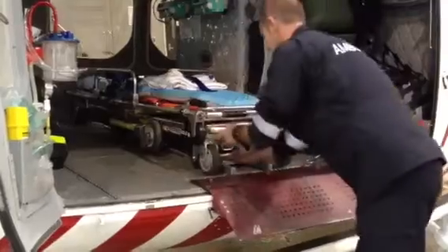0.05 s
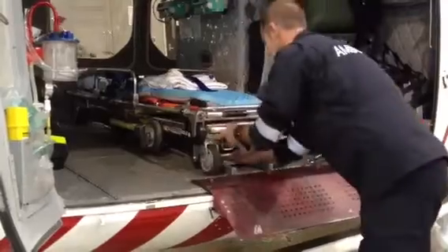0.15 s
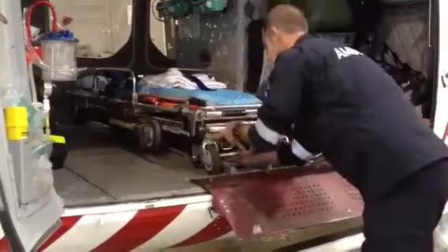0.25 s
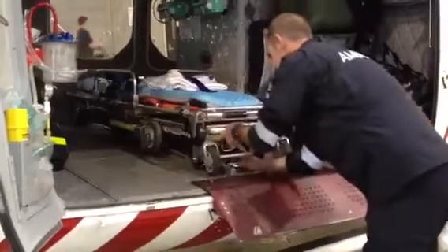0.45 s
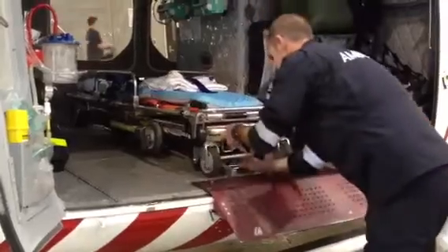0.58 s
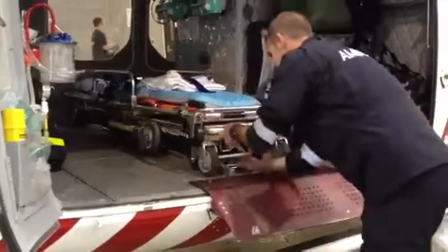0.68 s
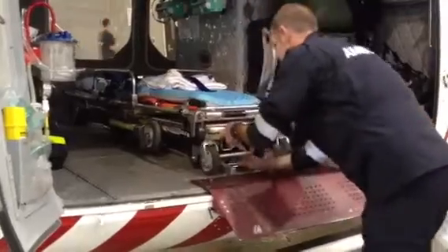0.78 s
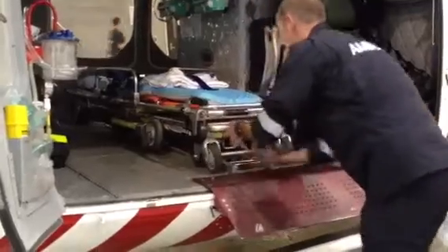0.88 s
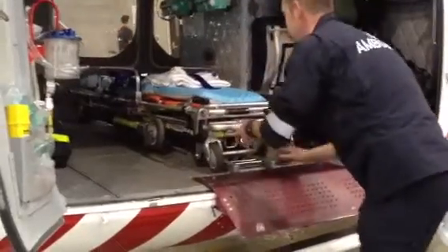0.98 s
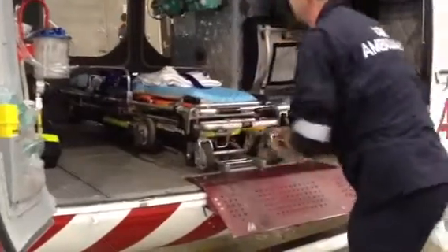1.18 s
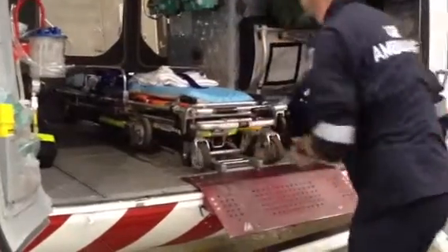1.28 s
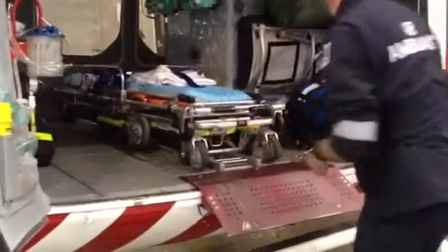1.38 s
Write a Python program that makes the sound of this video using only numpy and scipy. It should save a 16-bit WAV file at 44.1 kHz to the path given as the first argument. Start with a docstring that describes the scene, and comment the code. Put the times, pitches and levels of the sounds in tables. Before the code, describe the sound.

A metal stretcher clacks twice into its floor latch, ringing through a vehicle and hall.

```python
"""A steel catch ticks over soft wheel bumps as a stretcher is pushed into its floor latch, in the open
back of a vehicle parked in a large hall. The metal frame clacks home in two rattling bursts, each blow
a dense crack plus clear ringing modes, and the cabin and the hall ring on. Then the wheels bump the
hollow load floor again and the catch clinks once more, over a low rumble and the hall's steady wash."""
import sys
import numpy as np
from scipy import signal
from scipy.fft import rfft, irfft, next_fast_len
from scipy.io import wavfile

SR = 44100
rng = np.random.default_rng(int(sys.argv[2]) if len(sys.argv) > 2 else 0)


def put_to_file(sound):
    """Save the sound as 16-bit audio at rate SR, in the file named by the first command-line argument."""
    columns = np.atleast_2d(sound).T  # one column per channel
    safe = np.clip(columns, -1, 1)
    whole_steps = np.round(safe * 32767)
    wavfile.write(sys.argv[1], SR, whole_steps.astype(np.int16))


N = 63945
T = np.arange(N) / SR


def frame():
    """The frame rattles into the latch in two runs of hard blows; rows are cracks and rings."""
    # blows on the latch: t/s, level/dB, extra bass/dB, extra treble/dB, clear ring/dB
    blows = [(0.23, -45, 8, 7, -16), (0.2347, -30, -7.5, 0, -12.5), (0.2441, -25, -8, 0.5, 0.5),
             (0.249, -22, 0.5, -2.5, 1), (0.2552, -14, -6, -1, -3), (0.263, -38, 18, -8, -6),
             (0.318, -40.5, 9.5, -13, 4.5), (0.3724, -25, 1, 7, 2.5), (0.381, -20.5, 1, -2, -13),
             (0.386, -22, 7, 6, -6), (0.391, -23.5, 6.5, -10, -4.5), (0.399, -19, -5, -1.5, -1),
             (0.405, -19.5, -5, 5, -0.5), (0.4128, -11.5, -14, -27.5, 2), (0.418, -28, 7.5, 10, 2),
             (0.432, -22.5, -2, 3, -25), (0.441, -24, -5, -3.5, -4)]
    # colour of the frame's crack: f/Hz, level/dB
    colour = [(40, -44), (85, -26), (150, -3), (250, -4.5), (430, -2), (740, -6), (1100, 2), (1550, -6),
              (1950, -5), (3100, -9.5), (4600, -7), (5500, -14.5), (7000, -12.5), (8400, -8), (10000, -16),
              (15000, -18)]
    # its quick damping: f/Hz, t60/s
    decay = [(150, 0.12), (1000, 0.069), (4000, 0.068), (12000, 0.11)]
    # the frame's clear modes: f/Hz, level/dB, nominal t60/s
    modes = [(374, -15, .2), (414, -14, .15), (526, -14, .11), (656, -17, .13), (932, -9, .11),
             (1070, -6, .09), (1194, -7, .11), (1310, -10, .11), (1833, -12, .11), (1901, -14, .11),
             (2033, -16, .1), (2137, -16, .11), (2549, -17, .14), (2809, -19, .14), (3890, -13, .09),
             (4530, -12, .08), (4662, -14, .1), (4800, -13, .1), (7700, -12, .03), (8300, -6, .03),
             (8700, -8, .03)]
    out = np.zeros((2, N))
    for s, db, bass_db, treble_db, ring_db in blows:
        blow = soften(strike(colour, decay, modes, ring_db), attack_s=0.00055)
        add(out, s, from_db(db) * shelves(blow, bass_db, treble_db))
    return out


def catch(t60_s=0.12):
    """The small steel catch ticks, or scrapes with a softer attack; rows are cracks and rings."""
    # ticks and scrapes: t/s, level/dB, attack/s, extra top/dB
    ticks = [(0.0435, -49, 0.002, -5), (0.055, -35, 0.00044, 1), (0.083, -47.5, 0.001, 11),
             (0.093, -52, .003, 6), (0.147, -44, 0.0071, 2), (0.188, -53, .005, -10),
             (0.918, -44.5, 0.0014, -1.5), (0.933, -42, 0.0023, -12), (0.948, -65.5, 0.0028, 13),
             (1.03, -65, 0.0027, 0), (1.10, -65, .005, 0), (1.172, -63, .012, 0)]
    # colour of the catch's bright crack: f/Hz, level/dB
    colour = [(150, -49), (400, -32), (1500, 1.5), (2500, 1), (4500, 8.5), (6500, 0), (8300, 8),
              (10000, 6.5), (12500, -1.5), (15000, -2)]
    # the catch's clear modes: f/Hz, level/dB, nominal t60/s
    modes = [(2370, -3, .09), (2620, -7, .06), (4000, -11, .14), (4797, -7, .12), (5652, -12, .15),
             (6595, -15, .17), (7850, -2, .04), (8274, -4, .09), (9750, -4, .05), (10840, -7, .11),
             (11680, -6, .13), (12820, -11, .13)]
    out = np.zeros((2, N))
    for s, db, attack_s, top_db in ticks:
        tick = soften(strike(colour, [(1, t60_s)], modes, ring_db=0), attack_s)
        add(out, s, from_db(db) * shelves(tick, 0, top_db, treble_hz=11000))
    return out


def load_floor(t60_s=0.26):
    """The hollow load floor rumbles and thuds softly under the shifting wheels."""
    # swell of the rumble: t/s, level/dB
    swell = [(0, -53), (0.07, -49), (0.13, -55.5), (0.25, -49.5), (0.5, -53), (0.77, -55.5), (0.9, -48),
             (1.05, -49), (1.17, -52.5), (1.45, -58.5)]
    # colour of the rumble: f/Hz, level/dB
    rumble_colour = [(40, -44), (85, -30), (130, 0.5), (175, 0.5), (225, -3), (310, -1.5), (430, -6),
                     (650, -4.5), (1000, -14), (3000, -30.5)]
    # wheel bumps: t/s, level/dB
    bumps = [(0.022, -55), (0.041, -47), (0.187, -56), (0.79, -40.5), (0.811, -40), (0.868, -43),
             (0.915, -42), (0.989, -46)]
    # colour of the floor's dull thud: f/Hz, level/dB
    thud_colour = [(85, -16), (130, -1), (310, 3.5), (450, -4), (650, -3.5), (1000, -17), (3000, -41)]
    # the floor's hollow modes: f/Hz, level/dB, nominal t60/s
    modes = [(130.2, -6, 0.43), (220.5, -9, 0.46), (309.5, -4, 0.29), (436, -5, 0.16)]
    out = from_db(np.interp(T, *np.transpose(swell))) * noise(rumble_colour)
    for s, db in bumps:
        thud = strike(thud_colour, [(1, t60_s)], modes, ring_db=-1).sum(axis=0)
        add(out, s, from_db(db) * soften(thud, attack_s=0.006))
    return out


def strike(colour, decay, modes, ring_db, size=16384, scatter_db=4, ring_length=0.97):
    """One contact, never twice the same: rows are the dense crack and the clear ring."""
    t = np.arange(size) / SR
    snap = 1 + from_db(-14) * np.exp(-t / 0.0005)  # the instant of contact stands out
    crack = dense_ring(colour, decay, size) * snap
    crack *= np.sqrt(SR / 100) / np.linalg.norm(crack)  # the energy of 10 ms at rms 1
    ring = 0
    for hz, db, t60 in modes:
        gain = from_db(db + rng.normal() * scatter_db) * rng.choice([-1, 1])
        ring += gain * np.sin(2 * np.pi * hz * t) * from_db(-60 * t / (t60 * ring_length))
    return np.array([crack, from_db(ring_db) * ring])


def dense_ring(colour, decay, size):
    """Countless modes struck at once: each band has its own gain and dies at its own rate."""
    edges_hz = np.r_[30, 70, 110, np.geomspace(160, 17000, 28)]
    t = np.arange(size) / SR
    hz = np.arange(size // 2 + 1) * SR / size
    white = rfft(rng.standard_normal(size))
    out = 0
    for low, high in zip(edges_hz, edges_hz[1:]):
        centre = np.sqrt(low * high)
        band = irfft(white * (hz >= low) * (hz < high), size)
        band *= from_db(-60 * t / at_hz(decay, centre))
        band *= np.sqrt(2 * (high - low) / SR) / np.linalg.norm(band)  # energy follows bandwidth
        out += band * from_db(at_hz(colour, centre))
    return out


def soften(x, attack_s):
    """A sliding or padded contact fades in."""
    return x * np.minimum(T[:x.shape[-1]] / attack_s, 1)


def shelves(x, bass_db, treble_db, bass_hz=550, treble_hz=4000):
    """Turn a contact's bass and treble up or down by the given amounts."""
    low = signal.sosfilt(signal.butter(1, bass_hz, fs=SR, output="sos"), x)
    high = low_cut(x, treble_hz, order=1)
    return x + (from_db(bass_db) - 1) * low + (from_db(treble_db) - 1) * high


def cabin(x):
    """The cabin's close walls answer at once with a short, boomy ring."""
    # colour of the cabin: f/Hz, level/dB
    colour = [(100, 14), (250, 5), (1000, -4), (4000, -3), (12000, -12)]
    # its decay: f/Hz, t60/s
    decay = [(150, 0.49), (1000, 0.62), (12000, 0.5)]
    return reverb(x, colour, decay, level_db=-10, delay_s=0.005)


def hall(x):
    """The hall's distant walls answer later with a long tail."""
    # colour of the hall: f/Hz, level/dB
    colour = [(100, -2), (220, 6), (450, -5.5), (800, -0.5), (1120, -0.5), (1500, 3.5), (2500, 3.5),
              (4700, -1), (5800, 0.5), (8400, -7.5), (12500, -7), (14000, -26)]
    # its decay, longest in the upper mids: f/Hz, t60/s
    decay = [(150, 1.8), (500, 2.6), (1800, 3.44), (4500, 2.93), (8000, 1.32), (13000, 0.61)]
    return reverb(x, colour, decay, level_db=-12.5, delay_s=0.04)


def reverb(x, colour, decay, level_db, delay_s):
    """Diffuse reflections that start after a pre-delay."""
    response = dense_ring(colour, decay, size=65536)
    out = np.zeros(N)
    add(out, delay_s, from_db(level_db) * signal.fftconvolve(x, response)[:N])
    return out


def hall_wash():
    """A steady, dark bed of room tone."""
    # colour of the wash: f/Hz, level/dB
    colour = [(30, 5), (70, 7), (140, -1.5), (400, -3.5), (800, -7), (2000, -1), (4500, -9.5), (5700, -19),
              (9500, -31.5), (15000, -28)]
    return from_db(-54) * noise(colour)


def noise(colour):
    """Steady coloured noise of rms 1."""
    size = next_fast_len(N)
    hz = np.arange(size // 2 + 1) * SR / size
    white = rfft(rng.standard_normal(size))
    x = irfft(white * from_db(at_hz(colour, hz)), size)[:N]
    return x / np.std(x)


def from_db(db):
    """Decibels to gain."""
    return 10 ** (np.asarray(db) / 20)


def at_hz(points, hz):
    """Read a table on a log-frequency axis."""
    f, values = np.transpose(points)
    return np.interp(np.log(np.maximum(hz, 1)), np.log(f), values)


def low_cut(x, hz, order=4):
    """Roll off the lows."""
    return signal.sosfilt(signal.butter(order, hz, "high", fs=SR, output="sos"), x)


def add(out, s, x):
    """Mix a sound in at its time."""
    i = max(int(s * SR), 0)
    out[..., i:i + x.shape[-1]] += x[..., :N - i]


def scene():
    """Metal up front, ringing into cabin and hall, over the load floor and the room tone."""
    cracks, rings = low_cut(frame() + catch(), hz=137)  # the metal's sound carries no deep bass
    metal = cracks + rings
    hall_send = cracks + from_db(-9) * rings  # mainly the cracks fill the hall
    return (metal + cabin(metal) + hall(hall_send) + load_floor() + hall_wash())[None]


def record(dry, low_cut_hz=112, stop_hz=15700):
    """A small microphone: little deep bass, and the top is cut steeply."""
    top_cut = signal.cheby2(18, 70, stop_hz, fs=SR, output="sos")
    return signal.sosfilt(top_cut, low_cut(dry, low_cut_hz))


dry = scene()
out = record(dry)
put_to_file(out)
```